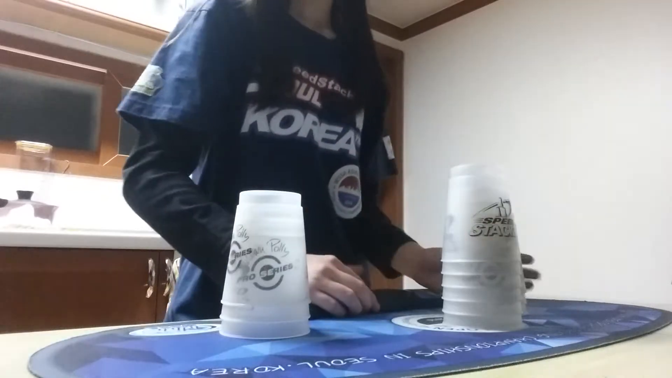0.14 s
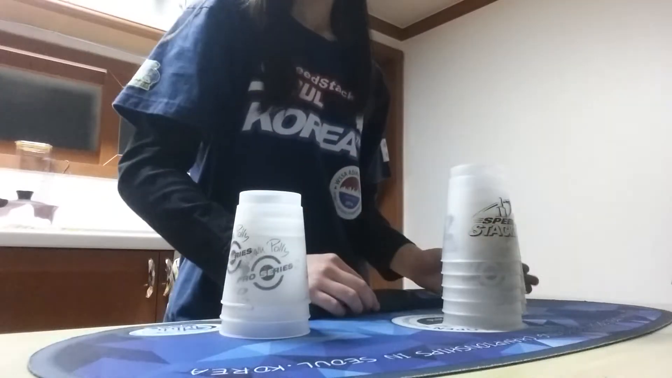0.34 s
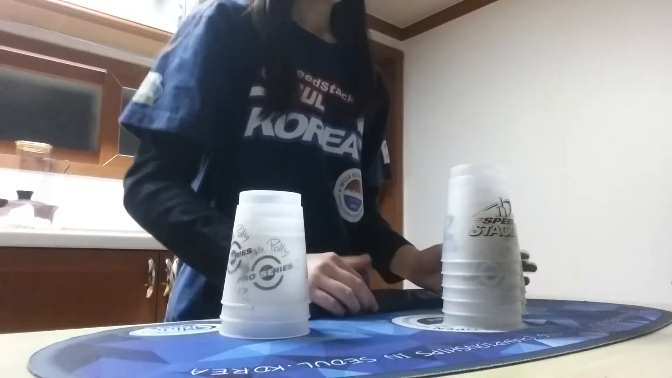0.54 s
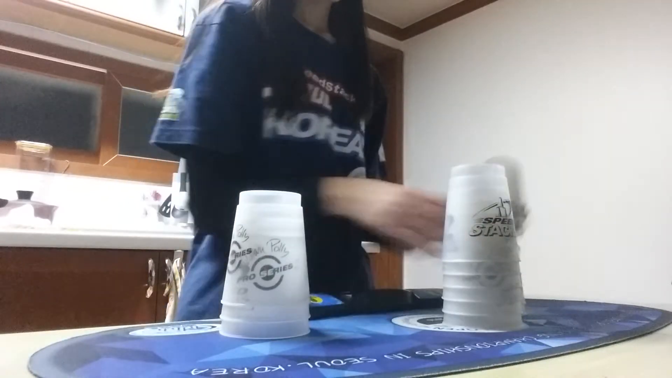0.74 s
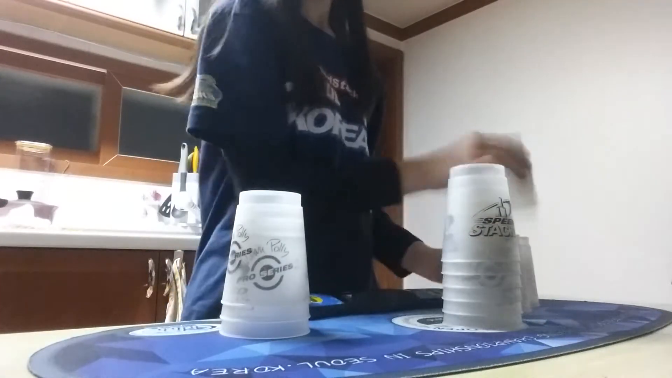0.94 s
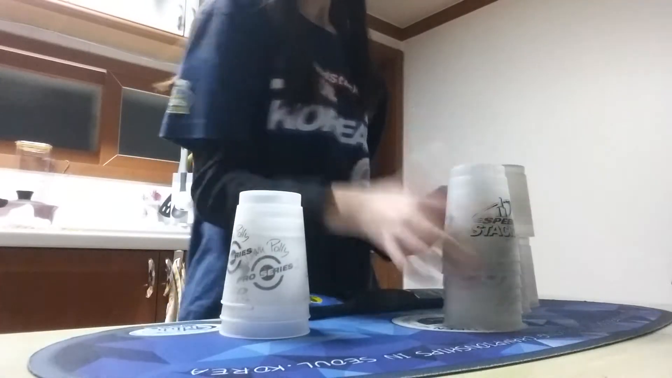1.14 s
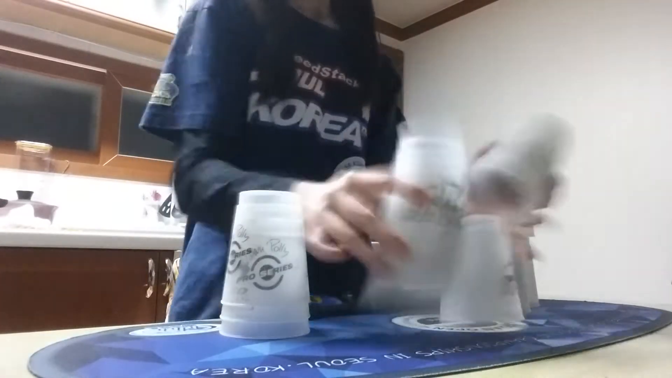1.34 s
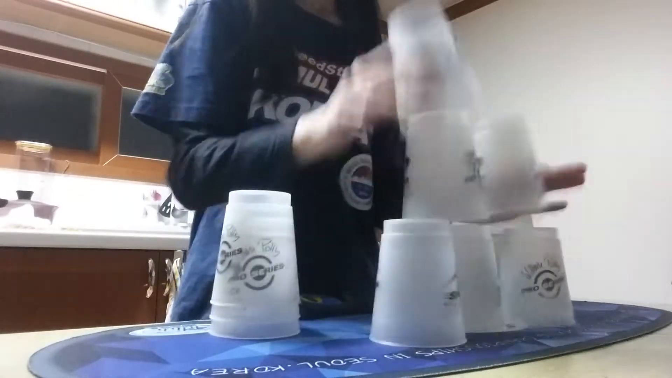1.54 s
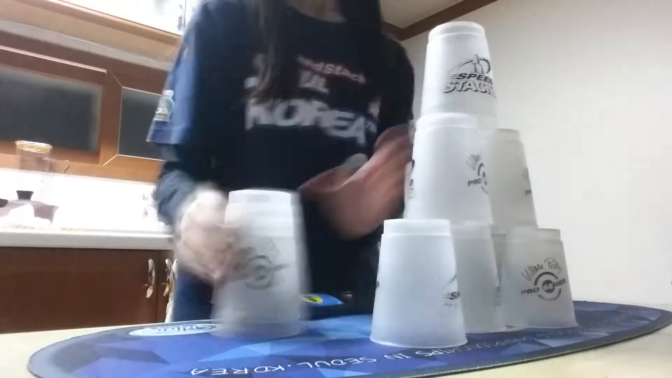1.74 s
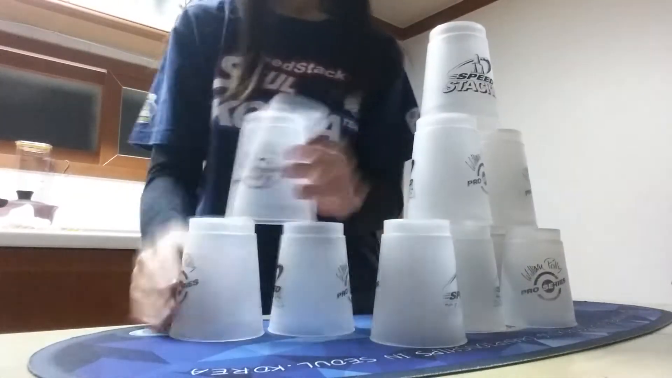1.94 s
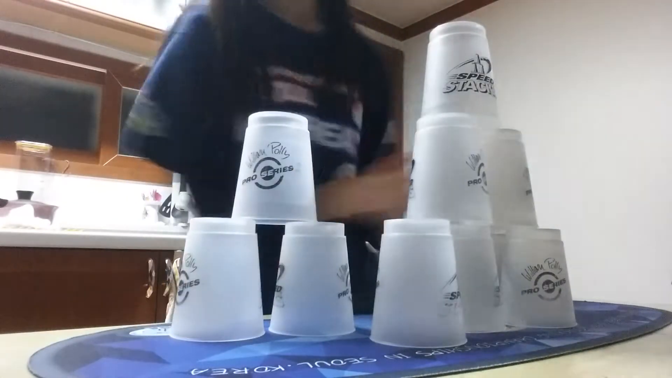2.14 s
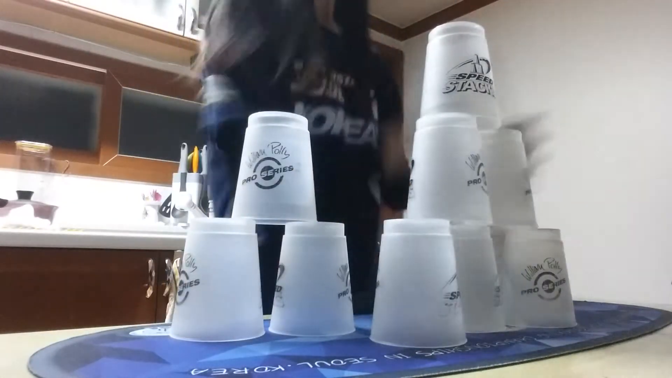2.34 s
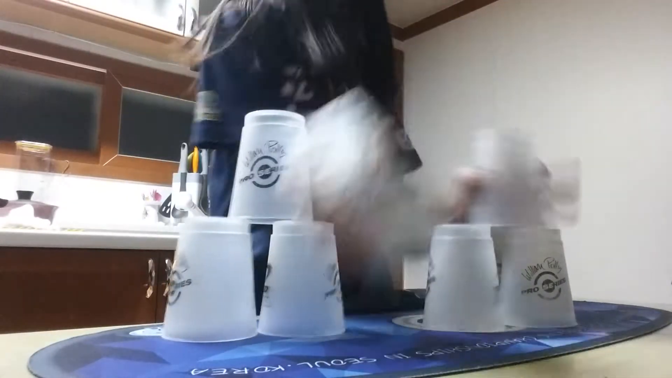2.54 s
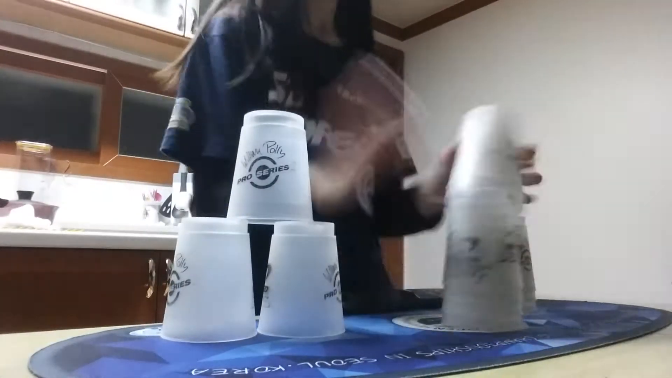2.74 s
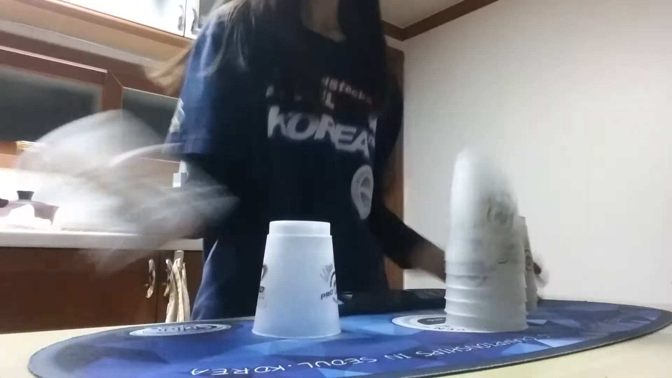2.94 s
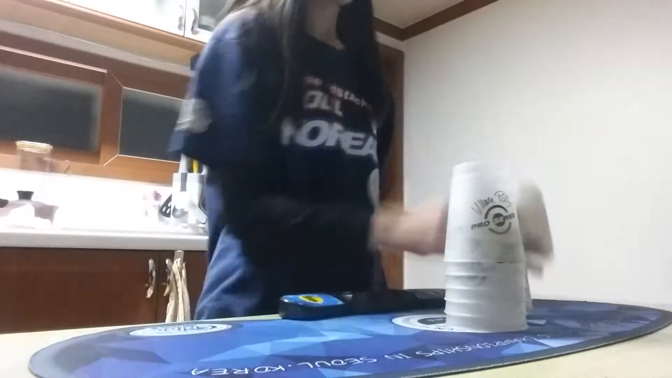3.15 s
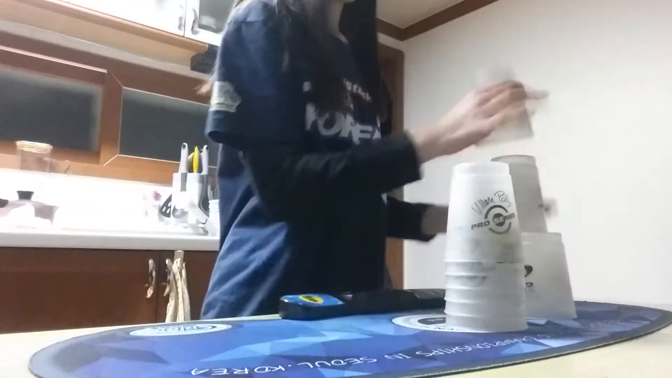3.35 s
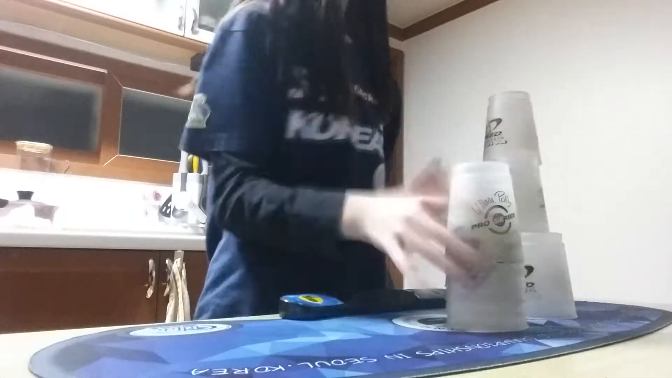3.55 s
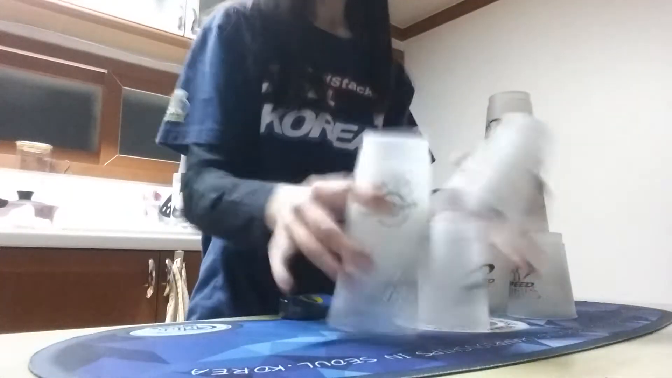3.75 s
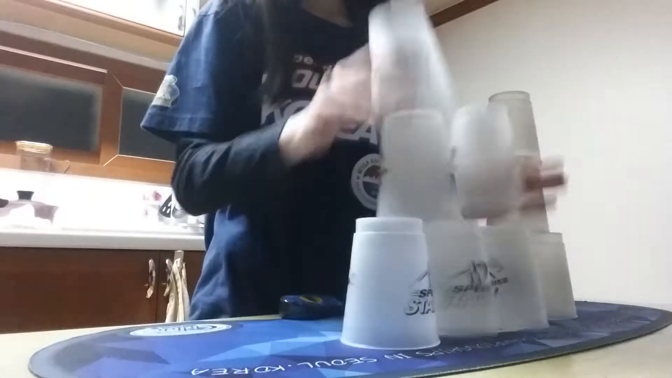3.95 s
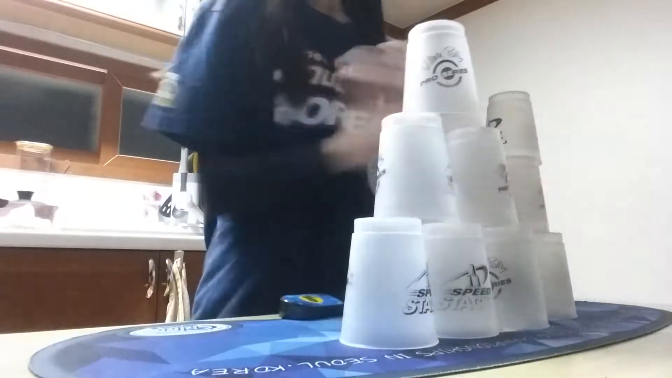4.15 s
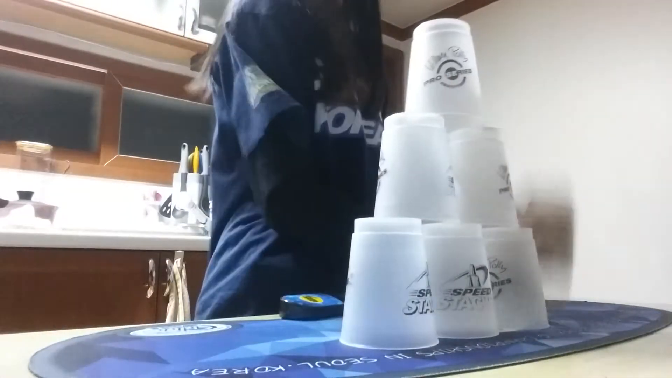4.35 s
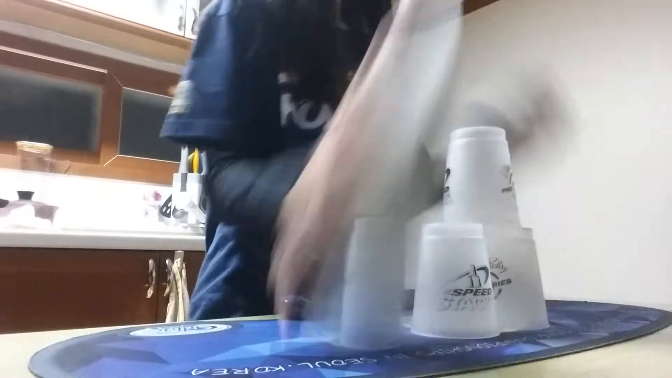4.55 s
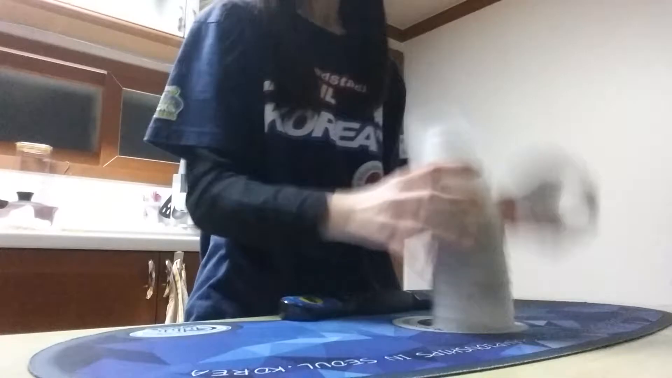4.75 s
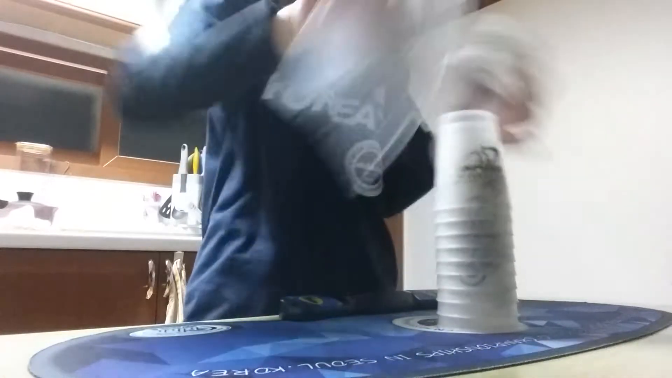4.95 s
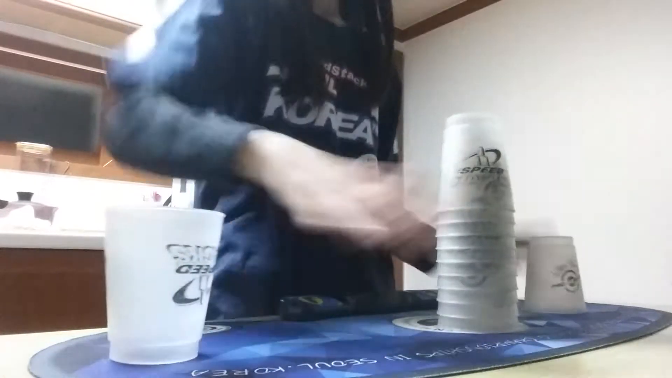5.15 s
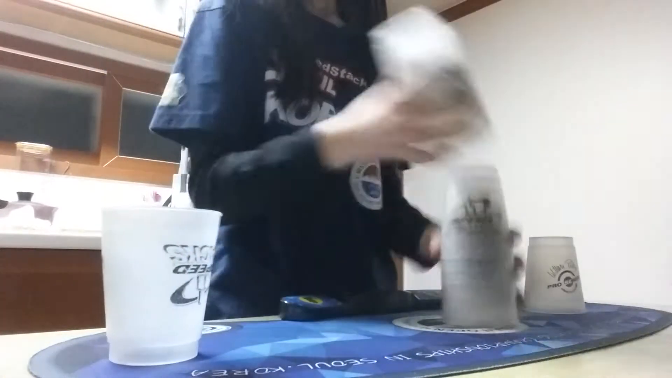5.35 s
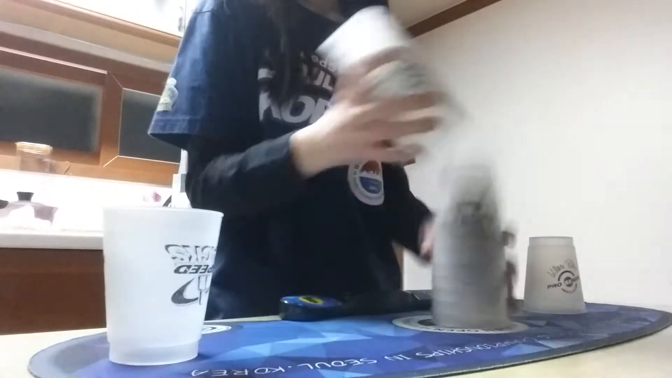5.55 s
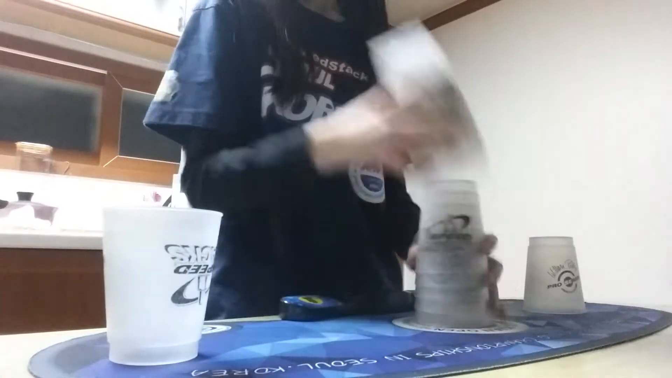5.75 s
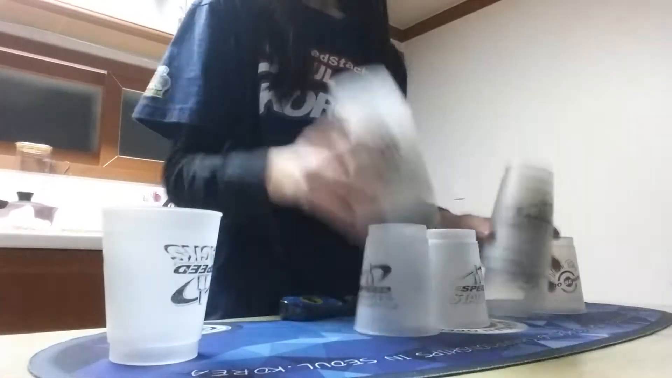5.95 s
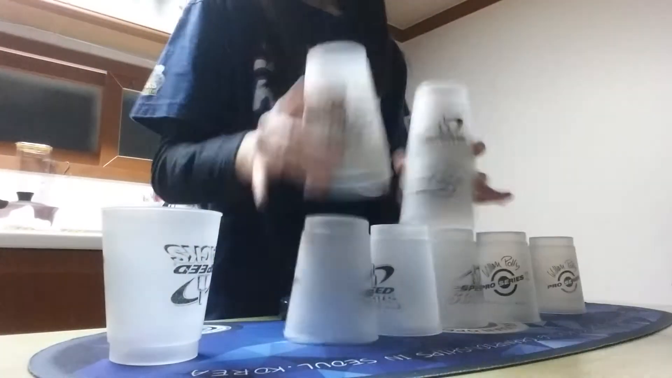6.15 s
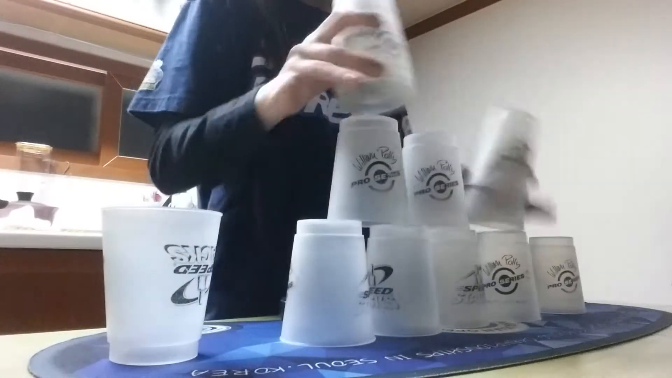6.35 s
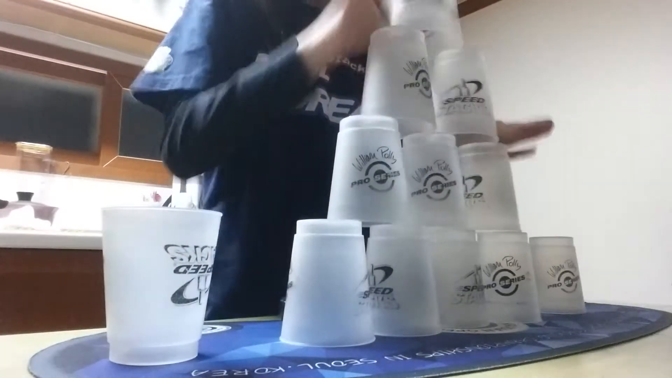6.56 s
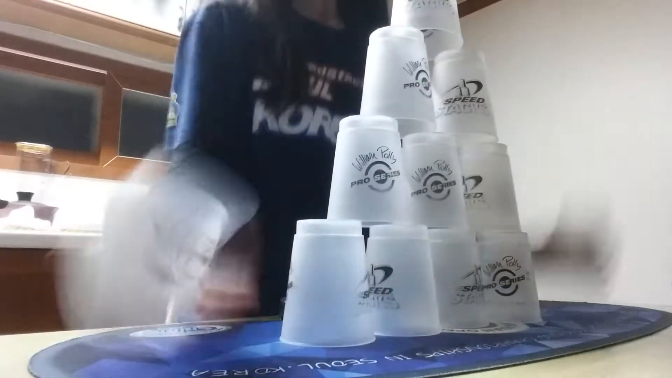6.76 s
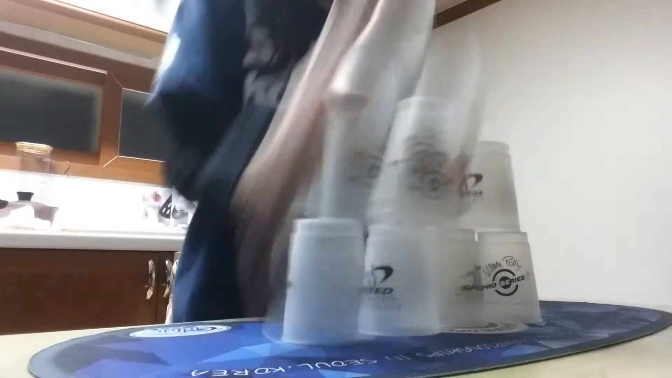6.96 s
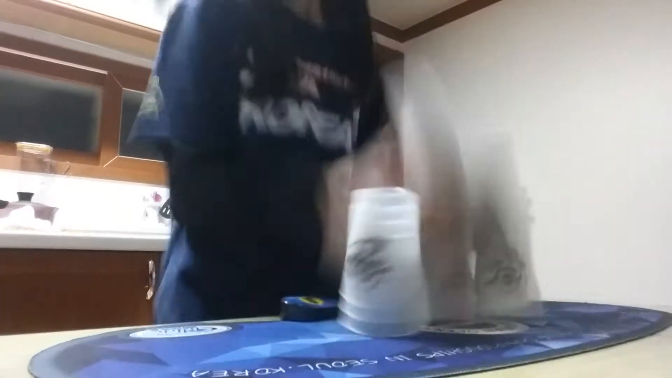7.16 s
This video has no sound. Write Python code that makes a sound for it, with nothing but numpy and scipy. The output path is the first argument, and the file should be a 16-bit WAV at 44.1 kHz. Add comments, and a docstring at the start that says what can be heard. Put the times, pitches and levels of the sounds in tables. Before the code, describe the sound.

Close stereo sound of hollow plastic cups stacked fast on a mat-covered table in a small, live room. From 0 to 0.25 seconds a scrape and tight clatter of knocks and ticks ends in a soft thud. Near quiet follows until about 0.8, with faint touches, then a clear knock at 1.1. From 1.4 to 2.05 hollow clacks come quickly with rasping slides; a short gap follows. From 2.3 to 3.2 softer, ticking clatter and nesting scrapes, with a low thump near 2.8. Sparse taps lead to stronger knocks at 3.5 and 3.9-4.1. At 4.4-4.7 a dense loud collapse slides down into a heavy table thud. Smaller dull knocks continue to 5.7, then loud hollow placements at 5.75 and 6.0, a steady run of taps to 6.65, a brief lull, and a sharp crashing clatter from 7.0. Short reverberation and faint hush throughout.

```python
"""In a small hard-walled room, plastic sport cups are stacked into pyramids on a mat and swept down at speed.
Every contact is an impulse that rings four families of cup modes: a hollow thump, a knock of the base,
a clack of the wall and a tick of the rim, shared out by its hardness and weight.
Cups chatter as they settle and rub by stick-slip as they nest; heavy landings boom in the table top.
Dense reflections answer each contact, over faint steady noise; a close pair of microphones listens."""
import sys
import numpy as np
from scipy import signal
from scipy.fft import rfft, irfft
from scipy.io import wavfile

SR = 44100
rng = np.random.default_rng(int(sys.argv[2]) if len(sys.argv) > 2 else 0)


def store_wav(level_fs):
    """Save 16-bit WAV to argv[1]."""
    pcm = np.round(np.clip(np.atleast_2d(level_fs), -1, 1) * 32767)
    wavfile.write(sys.argv[1], SR, pcm.T.astype(np.int16))


N = 317520  # samples, 7.2 s
RING_SAMPLES = 4096
RING_HZ = np.maximum(np.fft.rfftfreq(RING_SAMPLES, 1 / SR), 1)
RING_AGE_S = np.arange(RING_SAMPLES) / SR

# Modes of the hollow cup. Each row: frequency in Hz, bandwidth in Hz, relative strength in dB.
THUMP_MODES = [(148.7, 28.6, -10.5), (275.4, 33.6, -2), (386, 160, -9)]
# Modes of the base. Each row: frequency and bandwidth as multiples of the knock's pitch, relative strength in dB.
KNOCK_MODES = [(.6, 0.45, -4), (.85, 0.29, 3), (1.13, 0.28, 1.5), (1.6, 0.97, -8.5)]
# Modes of the wall. Each row: frequency in Hz, bandwidth in Hz, relative strength in dB.
CLACK_MODES = [(1400, 940, -3), (2127, 270, 1.5), (2570, 210, -6.5), (3155, 300, -2), (4300, 750, -6.5)]
# Modes of the rim. Each row: frequency in Hz, bandwidth in Hz, relative strength in dB.
TICK_MODES = [(5050, 1550, -9.5), (5650, 870, -1.5), (6870, 490, 1), (7765, 950, -6), (9640, 4000, -16),
              (12340, 2500, -15.5), (14440, 1600, -17.5)]
# Contacts of cup on cup or on the mat. Each row: start in seconds, knock level in dB, knock pitch in Hz,
# hardness as the rim's tick over the knock in dB, weight as extra thump in dB, remoteness as extra room in dB.
CONTACTS = [(0.0043, -25.5, 473, -1, 1.5, -6), (0.053, -35.5, 870, 14, -1.5, 3),
            (0.131, -35.5, 683, 11.5, 10, -3.5), (0.1659, -34.5, 900, 13.5, 5, 0.5),
            (0.178, -19, 745, 2.5, 3.5, -1.5), (0.1813, -14, 720, -17, 1.5, -2),
            (0.1935, -21, 660, 1.5, -2, -1), (0.2122, -17, 850, -9, 1, -3), (0.219, -12, 900, 3, 6.5, -2.5),
            (0.236, -17, 747, -1.5, 3, 3.5), (0.819, -50, 1100, -3.5, 6, 2),
            (0.915, -38, 527, -12.5, 5.5, 3.5), (0.986, -30.5, 606, -24.5, 6, -5),
            (0.991, -27.5, 594, -22.5, -9, 4), (1.0898, -14, 744, -7.5, 0.5, 5),
            (1.112, -42.5, 740, 13.5, -4, 4), (1.2798, -32.5, 564, -7.5, 0, -1),
            (1.3488, -39.5, 910, 0, 7, 4.5), (1.367, -29.5, 990, -3, 5, -6),
            (1.4286, -22.5, 950, 6.5, -6, 1), (1.4983, -15, 530, -13.5, -3.5, 2.5),
            (1.575, -11.5, 555, -11.5, 0, 5.5), (1.594, -26, 820, 9, -3, -7),
            (1.6132, -13, 810, -12, -10, 0.5), (1.633, -21.5, 620, 0, -3, -3),
            (1.6849, -12.5, 740, -9.5, -7, 1.5), (1.716, -10.5, 830, -8, 2, 4),
            (1.8688, -30.5, 630, 0.5, -3, -2), (1.896, -38.5, 710, 13.5, 8, -5.5),
            (1.9367, -23, 900, -0.5, 3.5, -6), (1.9895, -30, 1040, 8.5, -1, -11),
            (2.011, -30.5, 920, 8, 10, -2.5), (2.0489, -12, 900, -7, 2, -0.5),
            (2.0546, -10, 860, -12.5, -6.5, 3), (2.3111, -33.5, 485, -19, -5.5, 6),
            (2.366, -22.5, 510, -1.5, -2.5, 2.5), (2.4559, -26.5, 1110, -7, 3, 8.5),
            (2.4826, -23.5, 720, -5, 2.5, 7), (2.5594, -17.5, 734, 2, -3, -2.5),
            (2.5833, -22, 870, 4, 2, 2.5), (2.611, -18.5, 620, 3, 3, 0.5), (2.742, -28.5, 710, 5.5, 7, 1.5),
            (2.769, -20, 660, 1.5, 8.5, 1), (2.7752, -26, 544, 1, 9.5, 0.5),
            (2.8457, -28, 445, -4, -1, 5.5), (2.943, -32.5, 850, -4.5, 9, 5),
            (2.9591, -23.5, 796, 6.5, 7, -2), (2.9733, -22.5, 1040, 0, -4, 0),
            (2.9873, -20, 920, 0, 5, -0.5), (3.1132, -29.5, 835, 4.5, 4, -4), (3.127, -32, 730, 6.5, 0, 1),
            (3.145, -21, 667, -28, -2, -1), (3.1817, -33, 686, 2.5, 12.5, 2.5),
            (3.3222, -40, 990, -0.5, 5, 2), (3.3464, -31.5, 540, -7, 0, 3.5),
            (3.391, -28, 700, -10.5, -2, 2.5), (3.4767, -25, 780, -10.5, -4, 4.5),
            (3.5039, -15.5, 760, -7.5, -7, 0.5), (3.6853, -40, 507, -5, -0.5, -2.5),
            (3.7488, -33, 880, -2.5, 6, -0.5), (3.8853, -22.5, 567, -13, -2, 2),
            (3.899, -18.5, 945, -3.5, -2, -5), (3.9744, -23, 515, -26, -2.5, -4),
            (3.9883, -39.5, 610, 6.5, -3, 3), (4.029, -27, 900, -3, 5, 1),
            (4.0911, -18, 696, -7.5, -1, 3.5), (4.1271, -14.5, 737, -5.5, -4, 3),
            (4.334, -31.5, 835, -10.5, 1, 10), (4.3689, -30.5, 590, 0.5, 0.5, 8.5),
            (4.4077, -20, 740, 4.5, -11, 5), (4.4255, -16.5, 636, -21, -2.5, -8),
            (4.4399, -12.5, 607, -22, -2, 4.5), (4.5582, -16, 820, -2, 2.5, 4),
            (4.624, -15.5, 1040, -7.5, -10, -5), (4.642, -15.5, 940, 2, -4, -0.5),
            (4.6664, -14.5, 750, -4.5, -6, -0.5), (4.692, -10, 540, -6, 1.5, 1.5),
            (4.7751, -25, 580, -12, -8, 4), (4.806, -25, 550, -0.5, 0, 4.5),
            (4.8529, -22, 710, 2, 6.5, -0.5), (4.904, -43.5, 760, 13, -5, 1),
            (5.0152, -27, 645, -1, -3, 0.5), (5.1445, -22.5, 667, -15, 0, 2),
            (5.171, -20, 690, -23, -1, -0.5), (5.1778, -22.5, 730, -33, 9, -10),
            (5.348, -44, 840, -2, 1, 0.5), (5.42, -34.5, 680, -4, 7, 1.5), (5.5758, -29.5, 456, -7, -5, 4),
            (5.6631, -23.5, 600, -5.5, 6.5, 1.5), (5.7068, -30.5, 830, -3.5, 6, 5),
            (5.7405, -13.5, 614, -8.5, 1.5, -0.5), (5.9899, -10.5, 700, -14.5, -4.5, 1.5),
            (6.0716, -15.5, 587, -28, -3, -5), (6.08, -27, 646, 0.5, 8, -3),
            (6.1849, -16, 686, -23, 1.5, -0.5), (6.1916, -29, 564, 5.5, -2, -1),
            (6.2617, -17.5, 675, -6.5, -6, 0.5), (6.3395, -16, 660, -6.5, -5.5, -1.5),
            (6.3762, -17.5, 730, -5, -4.5, -5.5), (6.4457, -22, 624, -10.5, 0, 0),
            (6.4874, -20.5, 610, -6.5, -4.5, -1), (6.5223, -16, 770, -10, -8, -4.5),
            (6.5364, -19, 730, -6, -5, -3.5), (6.6117, -14, 700, -9.5, -6, -0.5),
            (6.6378, -16, 1030, -1, 2.5, 2.5), (6.8164, -35.5, 830, -9, 8, 2),
            (6.8385, -34, 570, -3, 7, -2.5), (6.8619, -49, 520, 16, 9, -4.5), (6.991, -28, 750, 3, 1, 3),
            (7.002, -18.5, 960, -2, -9, 4), (7.0306, -17, 930, 0.5, -0.5, 8),
            (7.056, -11, 830, -6.5, 1.5, 1), (7.0837, -16, 550, 4, 1.5, 1), (7.1341, -22, 750, 4, 3, -3.5)]
ROOM_SEND_DB = 0.63  # what every contact feeds into the room, before its remoteness


def contacts(places, chatter_db, chatter_s, lead_s):
    """Superposition of modes: each contact sums four rings, and two faint rebounds follow as the cup settles."""
    times, knock_db, knock_hz, hardness_db, weight_db, remote_db = np.transpose(CONTACTS)
    thump_db, clack_db, tick_db = contact_levels(knock_db, knock_hz, hardness_db, weight_db)
    thump = strikes(thump_db, THUMP_MODES, grit=0.7, crunch_s=0.0017, spread_db=3.0,
                    pan_db=-2.0, low_hz=67.0, high_hz=470)
    knock = strikes(knock_db, KNOCK_MODES, grit=0.94, crunch_s=0.0013, spread_db=2,
                    pan_db=0.0, low_hz=300, high_hz=1900, pitch=knock_hz)
    clack = strikes(clack_db, CLACK_MODES, grit=2.5, crunch_s=0.0013, spread_db=2.5,
                    pan_db=2.0, low_hz=1180, high_hz=4730)
    tick = strikes(tick_db, TICK_MODES, grit=4, crunch_s=0.00086, spread_db=1,
                   pan_db=-5.0, low_hz=3700, high_hz=18000)

    # the cups stand a little nearer to the left microphone
    arrival = np.exp(-2j * np.pi * RING_HZ * np.array([[0], [lead_s]]))
    hits = irfft(rfft(thump + knock + clack + tick) * arrival)
    waits = chatter_s * (.5 + rng.exponential(1, (len(times), 2)))
    rebound_gains = from_db(chatter_db + 5.5 * rng.standard_normal((len(times), 2)))

    direct = np.zeros((2, N))
    sent = np.zeros((places, 2, N))
    for k, start_s in enumerate(times):
        add(direct, start_s, hits[k])
        # the contacts go to the places on the mat in turn
        add(sent[k % places], start_s, from_db(ROOM_SEND_DB + remote_db[k]) * hits[k])
        rebound = .5 * knock[k] + clack[k] + tick[k]
        for wait_s, gain in zip(np.cumsum(waits[k]), rebound_gains[k]):
            add(direct, start_s + wait_s, gain * rebound)
    return direct, sent


USUAL_KNOCK_HZ = 700
THUMP_DB, THUMP_LOSS_DB_PER_OCTAVE = -7.5, 12
CLACK_DB = -4
CLACK_FOLLOWS_RIM = 0.9  # share of the hardness that the wall takes on


def contact_levels(knock_db, knock_hz, hardness_db, weight_db):
    """Energy sharing: low, heavy landings pump the cup's air; hard edges excite the rim and, in part, the wall."""
    octaves = np.log2(knock_hz / USUAL_KNOCK_HZ)
    thump_db = knock_db + THUMP_DB + weight_db - THUMP_LOSS_DB_PER_OCTAVE * octaves
    clack_db = knock_db + CLACK_DB + CLACK_FOLLOWS_RIM * hardness_db
    tick_db = knock_db + hardness_db
    return thump_db, clack_db, tick_db


def strikes(level_db, modes, grit, crunch_s, spread_db, pan_db, low_hz, high_hz, pitch=1):
    """Impulse excitation: a push common to both microphones and a crunch that differs at each drive the modes."""
    count = len(level_db)
    # square contacts are over at once, glancing ones graze for a few milliseconds
    graze_s = crunch_s * np.exp(0.43 * rng.standard_normal((count, 1, 1)))
    crunch = rng.standard_normal((count, 2, RING_SAMPLES)) * RING_AGE_S * np.exp(-RING_AGE_S / graze_s)
    force = grit * unit_energy(crunch)
    force[:, :, 0] += 1  # the push

    band = signal.butter(2, [low_hz, high_hz], "band", fs=SR, output="sos")
    passed = signal.sosfreqz(band, RING_HZ, fs=SR)[1]
    detuned = pitch * np.exp(0.041 * rng.standard_normal(count))
    response = modal_response(modes, detuned[:, None], spread_db)
    rings = irfft(rfft(force) * response * passed)

    # a level is the energy of the ring spread over 5 ms
    side_db = level_db[:, None, None] + np.array([[pan_db], [-pan_db]]) / 2
    return unit_energy(rings) * np.sqrt(SR / 200) * from_db(side_db)


def modal_response(modes, pitch, spread_db):
    """Resonance: each mode is a damped resonator, shifted in pitch by the grip and weighted by the spot hit."""
    response = 0
    for k, (mode_hz, width_hz, db) in enumerate(modes):
        # neighbouring modes alternate in sign
        strength = (-1) ** k * from_db(db + spread_db * rng.standard_normal(pitch.shape))
        detuning = (RING_HZ ** 2 - (mode_hz * pitch) ** 2) / (RING_HZ * width_hz * pitch)
        response = response + strength / (1 + 1j * detuning)
    return response[:, None]


# Cups and hands sliding. Each row: start in seconds, length in seconds, level of the dull rub in dB,
# level of the walls' hiss in dB, both before the gain of all slides.
SLIDES = [(.001, 0.046, -33, -26.5), (1.202, 0.22, -52, -49), (1.422, 0.052, -28.5, -26),
          (1.597, 0.19, -36.5, -31), (2.318, 0.098, -34.5, -39.5), (2.458, 0.058, -31, -24.5),
          (2.587, 0.056, -29.5, -49), (2.772, 0.11, -50, -50), (2.969, 0.051, -44, -35),
          (3.201, 1.31, -67, -55), (4.009, 0.066, -31.5, -55), (4.338, 0.077, -43, -37),
          (4.411, 0.15, -29.5, -29), (4.565, 0.06, -34, -33), (4.749, 0.091, -32, -35.5),
          (5.315, 0.1, -48, -53.5), (5.469, 0.56, -54.5, -50), (5.676, 0.052, -55, -32.5),
          (6.994, 0.095, -50, -42)]


def slides(catches_per_s, spread_db, clack_db, rub_hz):
    """Stick-slip friction: sliding walls catch and slip in dense tiny clicks that excite the cup's modes."""
    rub, hiss = np.zeros((2, 2, N))
    for start_s, length_s, rub_db, hiss_db in SLIDES:
        n = max(int(length_s * SR), 64)
        caught = rng.random(n) < catches_per_s / SR
        # a steady graze under clicks of scattered size
        roughness = 0.17 + caught * from_db(spread_db * rng.standard_normal(n))
        grains = rng.standard_normal((2, n)) * roughness
        stroke = np.sqrt(n) * unit_energy(grains) * signal.windows.tukey(n, .4)
        # the long waves of the rub reach both microphones alike
        add(rub, start_s, from_db(rub_db) * stroke[:1])
        add(hiss, start_s, from_db(hiss_db) * stroke)

    out = 0
    driven = [(rub, KNOCK_MODES, rub_hz), (from_db(clack_db) * hiss, CLACK_MODES, 1), (hiss, TICK_MODES, 1)]
    for clicks, modes, pitch in driven:
        ring = irfft(modal_response(modes, np.full((1, 1), pitch), spread_db=3.5)[0])
        ring = ring / np.linalg.norm(ring)
        out = out + signal.oaconvolve(clicks, ring, axes=-1)[:, :N]
    return out


# Heavy landings that shake the table under the mat. Each row: start in seconds, level in dB.
THUDS = [(0.222, -28), (1.28, -32.5), (1.345, -36), (2.767, -32), (4.44, -39), (4.693, -18), (5.014, -31.5),
         (5.741, -35), (7.055, -27), (7.082, -23)]
# Modes of the table top. Each row: frequency in Hz, bandwidth in Hz, relative strength in dB.
TABLE_MODES = [(54.6, 140, -10.5), (100, 26, -0.5), (142, 27, -3)]


def table():
    """Plate resonance: the table top booms briefly under a heavy landing."""
    times, level_db = np.transpose(THUDS)
    booms = strikes(level_db, TABLE_MODES, grit=.8, crunch_s=0.0045, spread_db=0.0,
                    pan_db=-3.0, low_hz=32, high_hz=196)
    out = np.zeros((2, N))
    for start_s, boom in zip(times, booms):
        add(out, start_s, boom)
    return out


# Decay of the reverberation. Each row: frequency in Hz, time to fall by 60 dB in seconds.
ROOM_T60 = [(100, 0.47), (300, 0.27), (800, 0.36), (2000, 0.36), (6000, 0.3459), (14000, 0.29)]
# Strength of the reverberation. Each row: frequency in Hz, level in dB against the sound sent into the room.
ROOM_DB = [(60, 9.5), (150, -8), (200, 0), (280, -2), (450, -4.5), (1000, -4.5), (2500, -5.5), (4200, 0),
           (5700, 1.5), (7500, -7), (10000, 0), (15000, -5)]
# Pickup of the reverberation by the microphones. Each row: frequency in Hz, left minus right in dB.
ROOM_BALANCE = [(120, -3.5), (500, -1.5), (2300, 3), (8000, 0.5), (14000, -3.5)]


def room(x, build_s, alike_below_hz):
    """Diffuse reverberation: dense reflections die band by band; long waves reach both microphones alike."""
    t = np.arange(SR // 2) / SR
    hz = np.maximum(np.fft.rfftfreq(len(t), 1 / SR), 1)
    alike = 1 / (1 + (hz / alike_below_hz) ** 2)
    mid, side = rfft(rng.standard_normal((2, len(t))))
    field = np.sqrt(1 + alike) * mid + np.sqrt(1 - alike) * side * [[1], [-1]]

    edges = np.geomspace(40, 18000, 24)
    echoes = 0
    for low, high in zip(edges, edges[1:]):
        centre = np.sqrt(low * high)
        decay = from_db(-60 * t / at_hz(ROOM_T60, centre))
        build_up = 1 - np.exp(-(t / build_s) ** 2)
        in_band = (hz >= low) * (hz < high)
        band = unit_energy(irfft(field * in_band, len(t)) * decay * build_up)
        level_db = at_hz(ROOM_DB, centre) + at_hz(ROOM_BALANCE, centre) * np.array([[1], [-1]]) / 2
        # each band holds its share of the spectrum
        echoes = echoes + band * from_db(level_db) * np.sqrt(2 * (high - low) / SR)
    return signal.oaconvolve(x, echoes, axes=-1)[:, :N]


# Spectrum of the still air in the room. Each row: frequency in Hz, relative density in dB.
HUSH_SPECTRUM = [(18, -49), (30, -6.5), (222, -1.5), (288, -7.5), (881, -20.5), (3150, -27), (5580, -19.5),
                 (15000, -28)]
HUSH_DB = -68  # rms level


def hush():
    """Stationary noise: random noise shaped by a fixed spectrum gives the faint steady room noise."""
    hz = np.maximum(np.fft.rfftfreq(N, 1 / SR), 1)
    spectrum = rfft(rng.standard_normal((2, N))) * from_db(at_hz(HUSH_SPECTRUM, hz))
    noise = irfft(spectrum, N)
    return from_db(HUSH_DB) * np.sqrt(N) * unit_energy(noise)


def from_db(db):
    """Logarithmic level: decibels to amplitude gain."""
    return 10 ** (np.asarray(db) / 20)


def at_hz(points, hz):
    """Logarithmic frequency: read a table by interpolating along octaves."""
    known_hz, values = np.transpose(points)
    return np.interp(np.log(hz), np.log(known_hz), values)


def unit_energy(x):
    """Energy normalization: scale each stereo sound to a mean energy of 1 a channel."""
    return x / np.sqrt(np.sum(x ** 2, axis=(-2, -1), keepdims=True) / 2 + 1e-20)


def add(track, start_s, sound):
    """Superposition: mix a stereo sound into a track from its start time on."""
    start = int(np.clip(round(start_s * SR), 0, N - 1))
    track[:, start:start + sound.shape[-1]] += sound[:, :N - start]


def scene():
    """Superposition of direct and reflected sound: each place on the mat has its own pattern of reflections."""
    direct, sent = contacts(places=5, chatter_db=-15.5, chatter_s=.007, lead_s=.00008)
    sliding = from_db(-3.0) * slides(catches_per_s=430, spread_db=7.5, clack_db=-9.0, rub_hz=488)
    sent[0] += from_db(1) * sliding

    # sound that leaves a cup to either side comes back to both microphones
    reflections = 0
    for place in sent:
        for side in place:
            reflections = reflections + room(side[None], build_s=0.0014, alike_below_hz=720)
    return direct + sliding + table() + reflections / np.sqrt(2) + hush()


def record(dry):
    """Overload and band limiting: the loudest peaks clip, then a steep low-pass cuts the top."""
    clipped = np.clip(dry, -1, 1)
    low_pass = signal.ellip(10, .1, 80, 15600, fs=SR, output="sos")  # cutoff in Hz
    return signal.sosfilt(low_pass, clipped)


dry = scene()
out = record(dry)
store_wav(out)
```